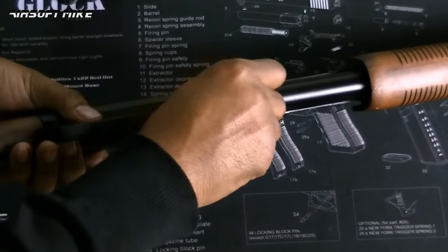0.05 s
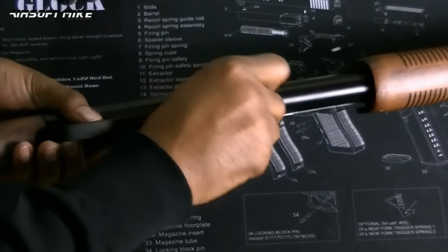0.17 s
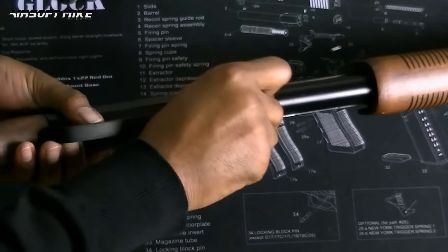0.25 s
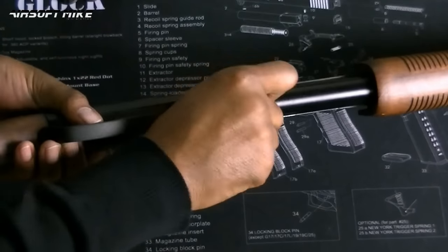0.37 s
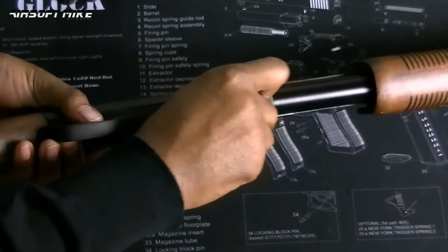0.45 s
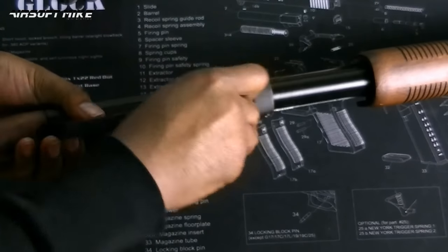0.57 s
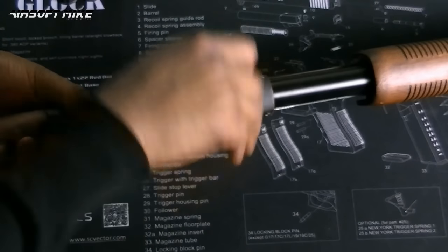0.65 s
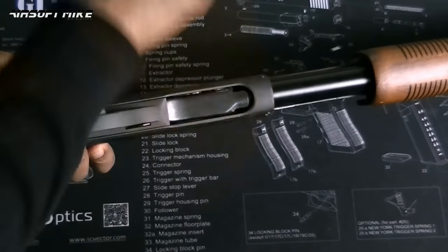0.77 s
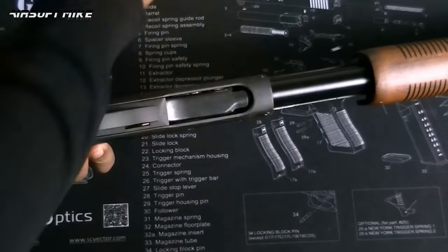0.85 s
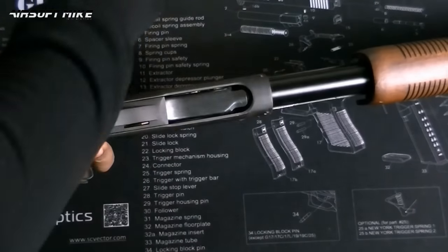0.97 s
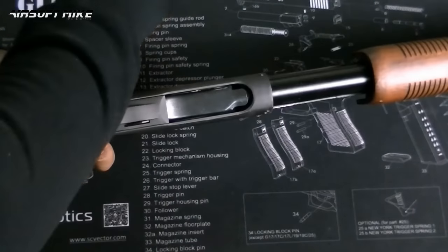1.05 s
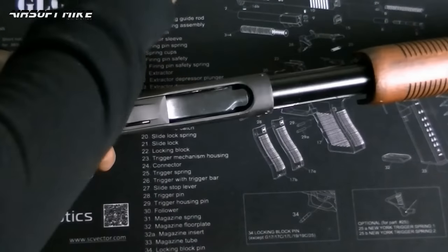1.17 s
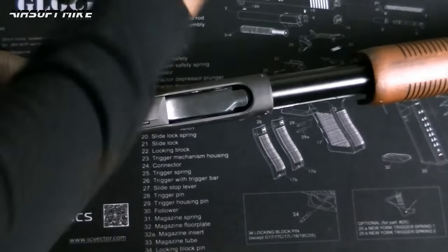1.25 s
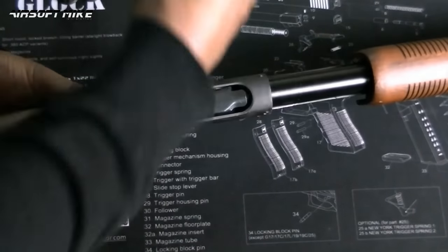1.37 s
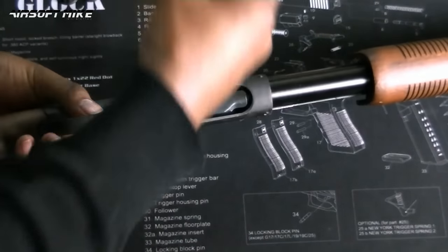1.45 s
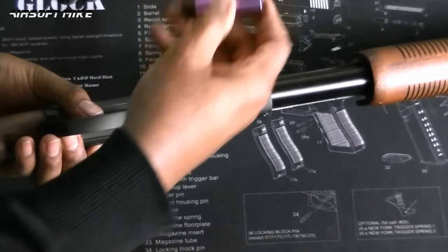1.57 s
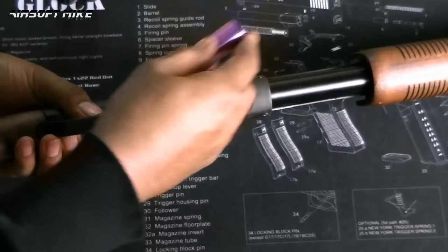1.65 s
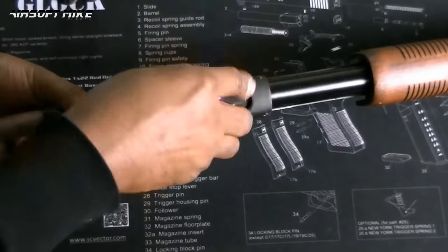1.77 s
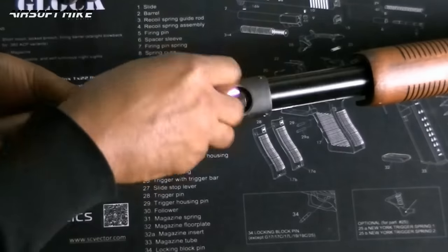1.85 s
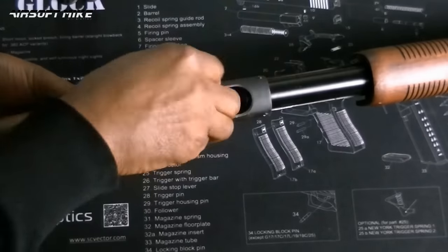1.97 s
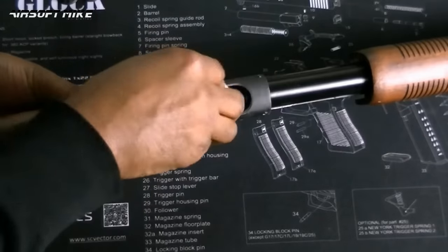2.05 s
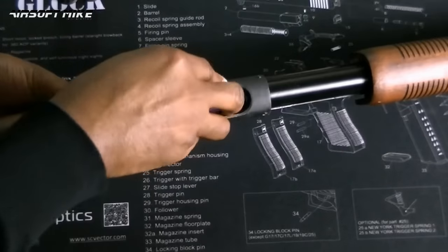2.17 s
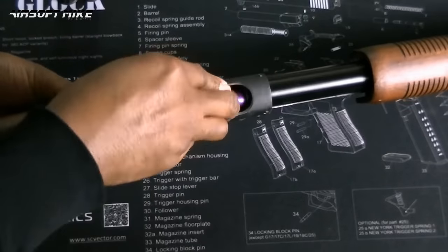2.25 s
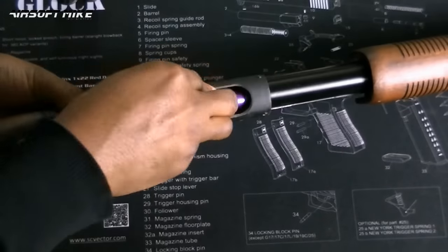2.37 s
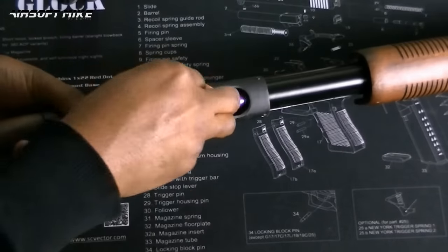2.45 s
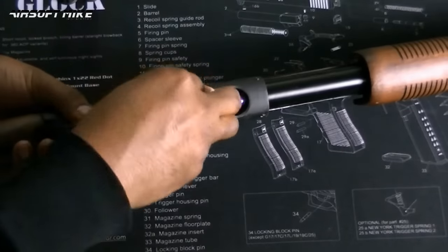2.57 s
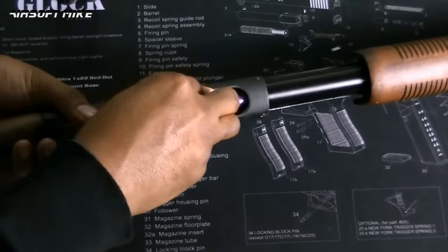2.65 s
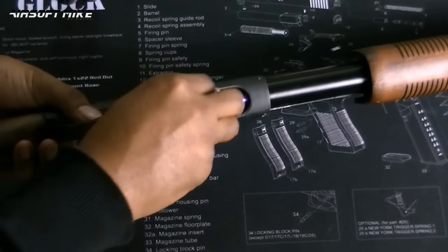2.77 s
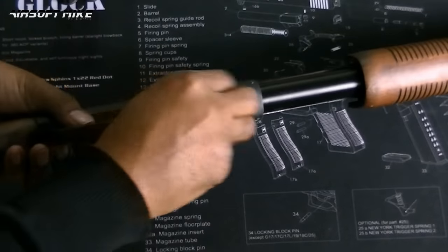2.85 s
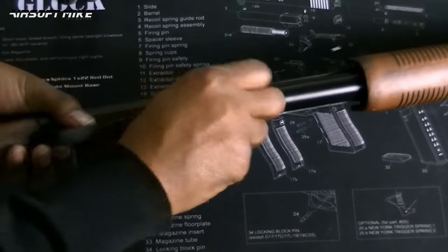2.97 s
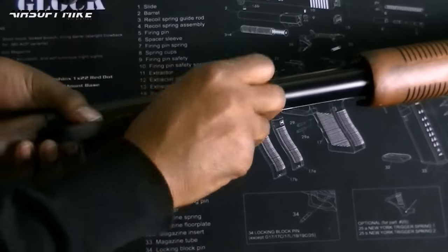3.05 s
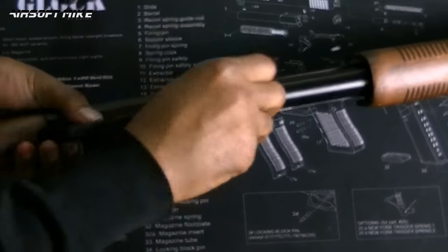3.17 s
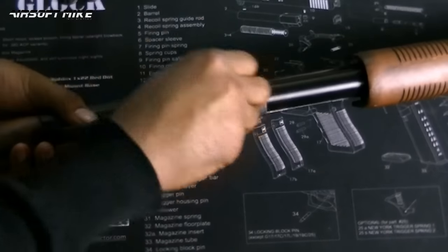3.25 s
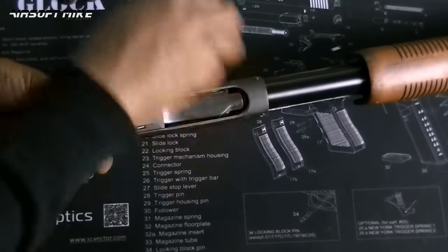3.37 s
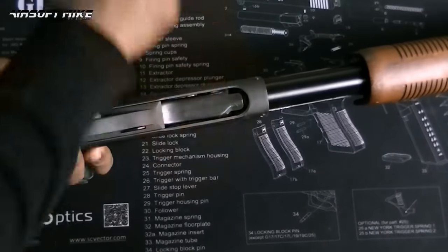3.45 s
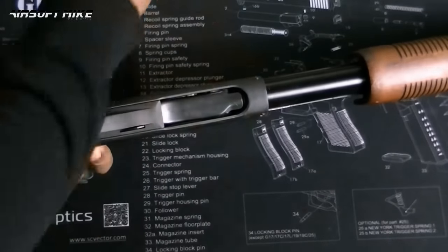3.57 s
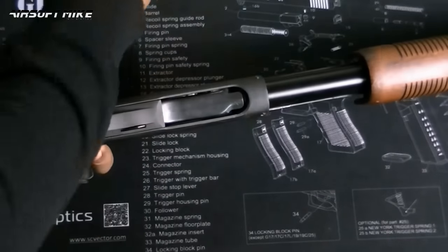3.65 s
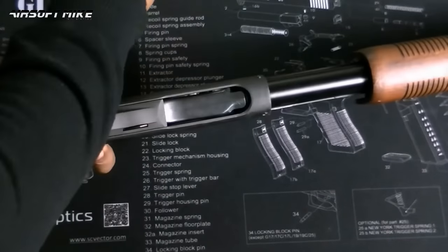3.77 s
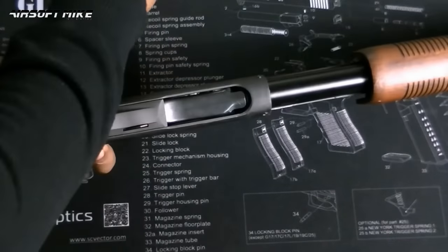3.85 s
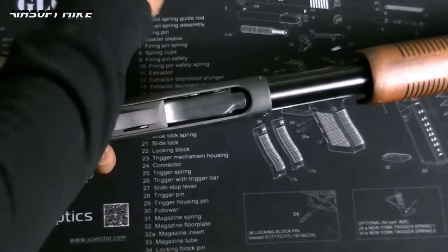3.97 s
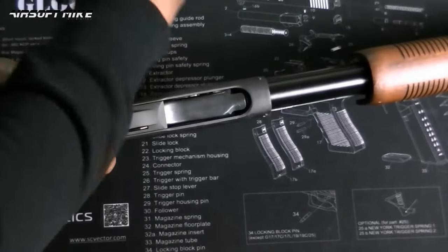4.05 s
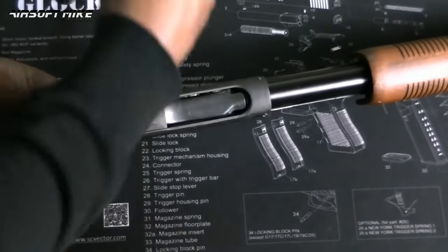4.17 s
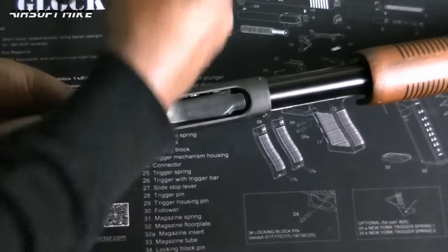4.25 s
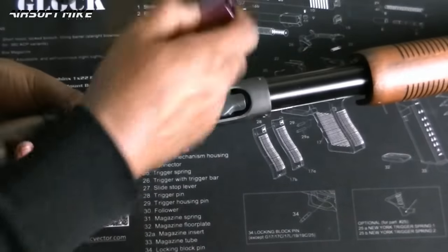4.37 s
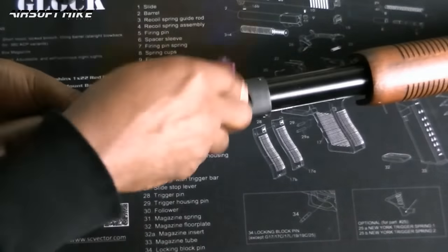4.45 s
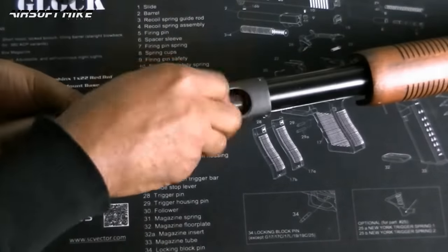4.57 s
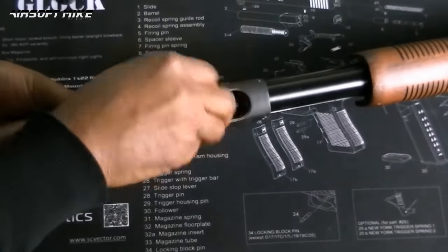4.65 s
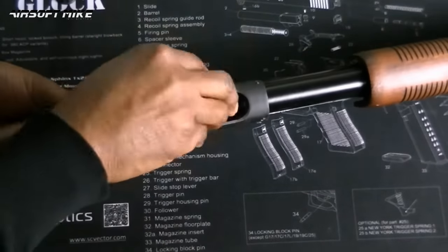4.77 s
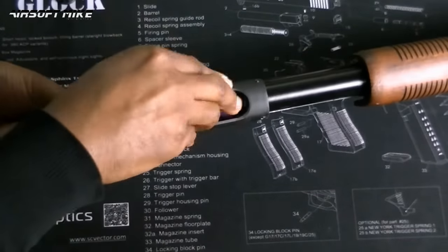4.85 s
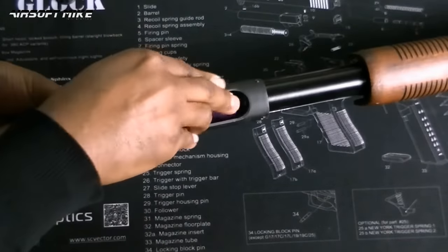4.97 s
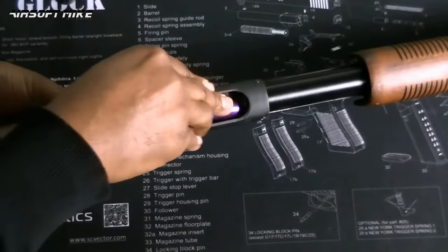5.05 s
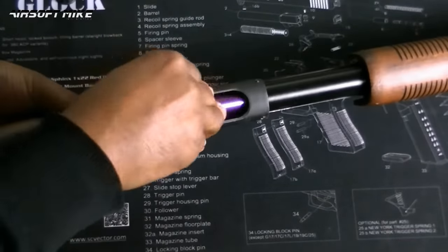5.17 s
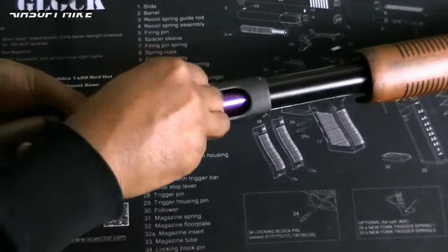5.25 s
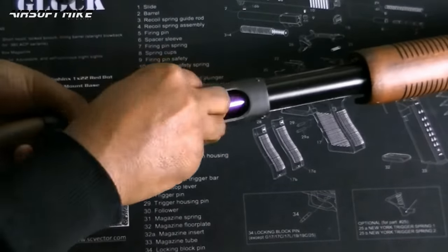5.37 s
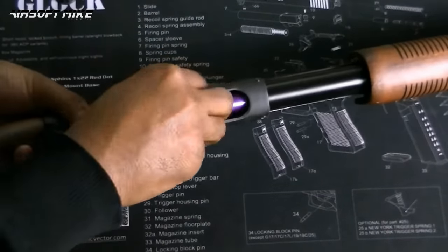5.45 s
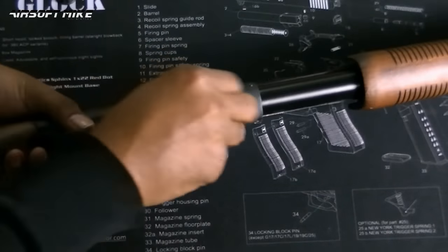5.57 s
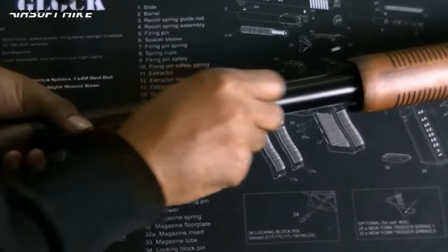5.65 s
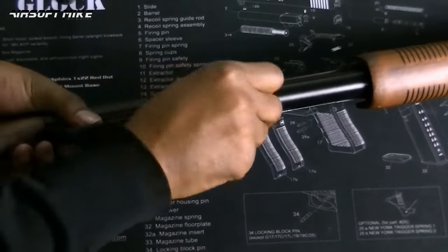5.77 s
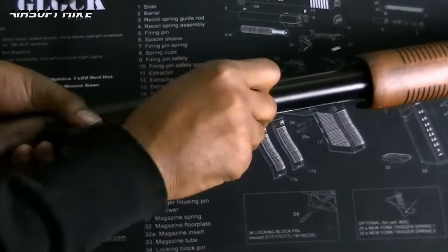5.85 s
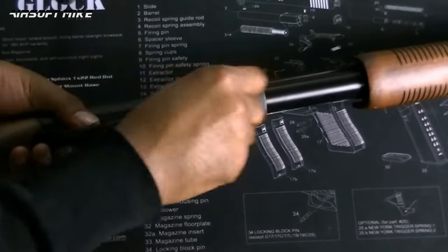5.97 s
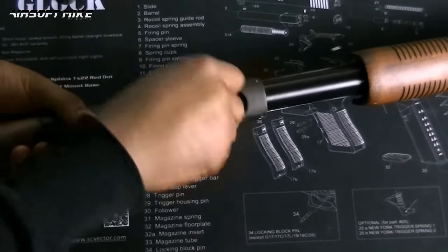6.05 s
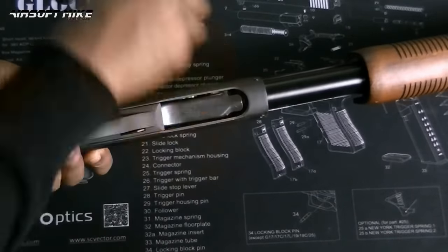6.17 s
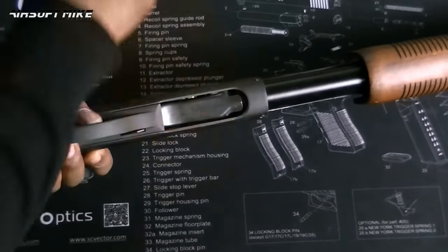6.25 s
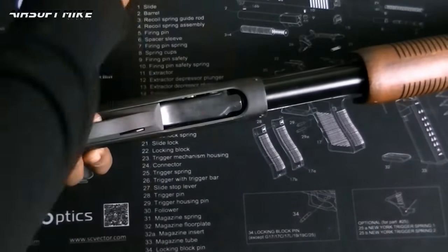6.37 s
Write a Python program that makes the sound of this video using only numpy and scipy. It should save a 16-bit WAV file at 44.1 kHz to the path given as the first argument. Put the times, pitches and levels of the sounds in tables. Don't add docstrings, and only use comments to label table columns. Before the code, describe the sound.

Very close to the microphone, shells are loaded into a toy shotgun. Hard metallic clacks and plastic ticks come in tight bursts, with short gritty scrapes along a hollow tube and a thin spring chirp. A pause with a faint sleeve brush follows, then more clicks, another pause, a few muffled wobbles and a final fast cluster. Dull thuds on the mat lie underneath; a small hard room answers each hit over quiet fan hum.

```python
import sys
import numpy as np
from scipy import signal
from scipy.fft import rfft, irfft, next_fast_len
from scipy.io import wavfile
from scipy.ndimage import uniform_filter1d

SR = 44100
rng = np.random.default_rng(int(sys.argv[2]) if len(sys.argv) > 2 else 0)


def magnitude_from_level(level_db):
    exponent = np.asarray(level_db, float) / 20
    return 10 ** exponent


def int16_out(signal):
    q = np.round(np.clip(np.atleast_2d(signal).T, -1, 1) * 32767)
    wavfile.write(sys.argv[1], SR, q.astype(np.int16))


N = 282681


def evened(x):
    return x / np.sqrt(np.mean(x ** 2) + 1e-20)


def read(points, hz):
    f, value = np.transpose(points)
    return np.interp(np.log(hz + 1), np.log(f + 1), value)


def add(mix, s, sound):
    part = mix[round(s * SR):][:len(sound)]
    part += sound[:len(part)]


def coloured(x, db_at):
    size = next_fast_len(N + 4096)
    gain = magnitude_from_level(db_at(np.fft.rfftfreq(size, 1 / SR)))
    return irfft(rfft(x, size) * gain, size)[..., :N]


def resonate(x, hz, width):
    r = np.exp(-np.pi * width / SR)
    pole = r * np.exp(2j * np.pi * hz / SR)
    return 2 * signal.lfilter([1 - r], [1, -pole], x).real


def body(x, humps):
    return sum((-1) ** k * magnitude_from_level(db) * resonate(x, f, w) for k, (f, w, db) in enumerate(humps))


# [f/Hz, level/dB per Hz]
HUM = [(12, -43), (20, -7), (142, -13), (262, -9.5), (976, -15), (3740, -25), (13900, -42), (16000, -74)]
# [f/Hz, likeness 0..1]
HUM_SAME = [(60, 0.76), (180, 0.47), (550, 0.47), (1650, 0.57), (4970, 0.52), (15000, 1)]
# [f/Hz, width/Hz, level/dB]
FAN = [(149.3, 14, -69), (193.5, 11, -69), (413.6, 13.4, -74), (3200, 31, -75), (4060, 27, -78.5)]


def hum():
    level_db, patch_db = -58.5, 1.0
    frames, hz = N // 256 + 5, np.fft.rfftfreq(1024, 1 / SR)
    a, b, c, d, patches = rng.standard_normal((frames, 513, 5)).T
    patches = evened(uniform_filter1d(uniform_filter1d(patches, 8, 0), 20, 1))
    same = np.clip(read(HUM_SAME, hz), -1, 1)[:, None]
    left = a + 1j * b
    right = same * left + np.sqrt(1 - same ** 2) * (c + 1j * d)
    z = np.array([left, right]) * magnitude_from_level(read(HUM, hz)[:, None] + patch_db * patches)
    air = magnitude_from_level(level_db) * evened(signal.istft(z, nperseg=1024, noverlap=768)[1][:, :N])
    noise = rng.standard_normal(N)
    return air + sum(magnitude_from_level(db) * evened(resonate(noise, f, w)) for f, w, db in FAN)


# [t/s, length/s, scrape level/dB at the start, growth/dB to the end]
SLIDES = [
    (0.0, 0.026, -22.5, -21),
    (0.017, 0.11, -37, 12.5),
    (0.406, 0.039, -30.5, -10.5),
    (0.553, 0.05, -33, 11.5),
    (2.842, .155, -28, 3.5),
    (5.614, .113, -24, -6),
]
# [t/s, length/s, scrape level/dB at the start, growth/dB to the end]
NUDGES = [
    (5.13, 0.023, -64, 31),
    (6.0, .02, -48, 9.9),
    (.538, .012, -47, 17),
    (5.536, .01, -48, 16),
]
NUDGE_SPEED = 0.15
# [f/Hz, width/Hz, level/dB]
SCRAPE = [(1770, 1370, 2), (2400, 1000, -6.5), (3200, 590, -5), (4500, 1800, 7), (5630, 810, 11),
          (6300, 860, 6)]
# [f/Hz, width/Hz, level/dB]
TUBE = [(604, 54, -13), (772, 109, -10.5), (881, 30.3, 2.5), (958.6, 47, 2), (1070, 154, -4.5)]
# [f/Hz, width/Hz, level/dB]
HISS = [(8300, 530, -3.5), (10400, 1470, 0.5), (13800, 5500, -5.5)]


def slide(start, length, db, growth_db, top_speed=1):
    drone_ends_db, drone_fast_db = -5, -33.5
    hiss_ends_db, hiss_fast_db = -6.5, -1.5
    slips_per_s = 14000
    t = np.arange(0, length, 1 / SR)
    speed = top_speed * np.sin(np.pi * t / length)
    drone_db = drone_ends_db + (drone_fast_db - drone_ends_db) * speed
    hiss_db = hiss_ends_db + (hiss_fast_db - hiss_ends_db) * speed
    sign, grip = rng.standard_normal((2, SR // 4))[:, :len(t)]
    size, draw = rng.random((2, SR // 4))[:, :len(t)]
    slips = sign * magnitude_from_level(2.7 * np.minimum(-np.log(size), 3)) * (draw < slips_per_s / SR)
    slips *= magnitude_from_level(0.91 * evened(uniform_filter1d(grip, 150)))
    scrape, drone, hiss = (body(slips, humps) for humps in (SCRAPE, TUBE, HISS))
    sound = evened(scrape) + magnitude_from_level(drone_db) * evened(drone) + magnitude_from_level(hiss_db) * evened(hiss)
    edges = np.clip(np.minimum(t + (start == 0), length - t) / 0.002, 0, 1)
    return start, magnitude_from_level(db + growth_db * t / length - 2.0) * sound * edges


# [t/s, peak level/dB, contact f/Hz, gun shake/dB re peak, treble crack/dB re peak]
SNAPS = [(0.0149, -14.5, 5270, -4.5, -16), (0.4124, -28, 3200, 5, -3), (1.9663, -11, 4610, -7, -11),
         (2.6493, -21.5, 4490, -11, -8.5), (2.9091, -15.5, 4690, -10, -18), (2.9413, -28, 3180, 6, 5.5),
         (3.0183, -2, 4500, -6.5, -16), (3.394, -12.5, 2246, -9.5, -14.5), (4.6297, -7, 4540, -11, -15),
         (5.1905, -5, 4530, -6.5, -7), (5.5665, -14, 5780, -7.5, -8), (5.7276, -13.5, 2960, 1, -14),
         (6.1559, -9.5, 2720, -13.5, -14)]
# [t/s, peak level/dB, contact f/Hz, shake/dB re peak]
TICKS = [(0.1033, -6.5, 1650, -7), (0.1143, -9.5, 3440, -11), (0.4209, -33, 3220, -10),
         (0.6211, -6.5, 3110, -7.5), (0.6398, -12.5, 1600, -9.5), (0.7146, -9.5, 2080, -13),
         (1.1162, -28.5, 5100, -5.5), (1.9787, -15, 5000, -11), (2.0685, -15, 1770, -11),
         (2.2601, -13.5, 3200, -11), (2.3225, -27.5, 4200, -14.5), (2.7726, -33.5, 3100, -13),
         (2.8395, -7, 2890, -3.5), (3.8691, -27.5, 4920, -6), (3.9758, -28.5, 4920, -6.5),
         (5.0854, -26, 1780, -7), (5.2554, -7.5, 4740, -9.5), (5.5442, -12, 1980, -6),
         (5.5512, -16.5, 2000, -4.5), (5.7364, -7, 2900, 3), (6.0215, -13, 1970, 4.5),
         (6.0471, -2, 3150, -7.5)]
# [t/s, peak level/dB, contact f/Hz, shake/dB re peak, tube ring/dB re peak]
CLACKS = [(0.1946, -12.5, 4160, -6, -5), (0.2055, -2.5, 3130, -2, -8), (0.5966, -7, 2015, -4, -7),
          (0.6105, -12, 1600, -20, -9), (2.4019, -1, 4420, -6.5, -11.5), (2.7582, -32, 2940, -7.5, -7),
          (3.046, -5.5, 3144, -1, -6), (5.249, -6.5, 3070, -5, -19.5), (5.4114, -11.5, 4700, -6, -15.5),
          (5.7410, -3.5, 4060, -5, -17), (5.7514, -5, 2480, -2, -5), (6.0329, -6, 4500, -5.5, -10.5)]
# [t/s, peak level/dB, contact f/Hz, shake/dB re peak, tube ring/dB re peak]
KNOCKS = [(0.2796, -16, 1237, 1.5, -5), (0.5492, -14, 3230, 1.5, -13), (2.0345, -7.5, 4430, -11.5, -17),
          (2.2263, -18.5, 3100, -2.5, -6), (2.3454, -16, 3330, -9, -15.5), (2.3828, -9.5, 1420, -23, -6),
          (2.4851, -12.5, 2980, -5.5, -14.5), (2.8264, -27, 3120, 2, -7), (2.8888, -11.5, 4800, -8, -11),
          (3.0038, -6.5, 4370, 1, -11.5), (3.271, -16.5, 3350, -6.5, -7.5), (5.0765, -21, 1650, -4, -7.5),
          (5.1511, -11.5, 2540, -6, -6), (5.6120, -16, 3020, -0.5, -1)]
# [t/s, peak level/dB, contact f/Hz, shake/dB re peak, tube ring/dB re peak]
WOBBLES = [
    (4.7132, -8, 3560, -3, -14.5),
    (4.776, -14, 4620, -6, -15),
    (4.8534, -35, 4300, -22, -5),
    (4.8778, -21, 1530, -12, -10.5),
    (4.8983, -24, 1650, -8, -9.5),
    (4.9472, -32, 1770, -19, -21),
]


def contacts():
    snap_tube_db, tick_tube_db, tick_bright_db = -21, -24, -19.5
    rows = [(*row[:-1], snap_tube_db, row[-1]) for row in SNAPS]
    rows += [(*row, tick_tube_db, tick_bright_db) for row in TICKS]
    for kind, bright_db in ((CLACKS, -11.5), (KNOCKS, -22), (WOBBLES, -29)):
        rows += [(*row, bright_db) for row in kind]
    return sorted(rows)


def rung(modes, t, luck, spread_db):
    hz, db, t60 = np.transpose(modes)[:, :, None]
    size, tune = luck[:2 * len(modes)].reshape(2, -1, 1)
    level = np.sign(tune) * magnitude_from_level(db + spread_db * size - 60 * t / t60)
    return (level * np.sin(2 * np.pi * hz * (1 + 0.02 * tune) * t)).sum(0)


# [f/Hz, level/dB, t60/s]
PARTS = [(1462, -2.5, 0.02), (1770, -9.5, 0.041), (2087, -1, 0.011), (2616, 1.5, 0.0073),
         (3365, -2.5, 0.0079), (3365, -7.5, 0.0033), (4500, 0.5, 0.018), (4817, -9.5, 0.033),
         (5784, -8, 0.016), (6840, -6, 0.014)]
# [f/Hz, level/dB, t60/s]
PING = [(9250, -65.5, 0.12), (9680, -44, 0.12)]
# [f/Hz, width/Hz, level/dB]
GUN = [(1330, 180, 0.5), (1770, 250, 6), (2450, 2250, -1.5), (3210, 800, 6.5), (4390, 1470, 0),
       (6220, 3600, 0)]


def click(row, luck):
    s, peak_db, hz, shake_db, tube_db, bright_db = row
    t = np.arange(len(luck)) / SR
    touch = magnitude_from_level(-60 * t / 0.035) * (1 - np.exp(-t / 0.0002)) / (1 + (t / 0.006) ** 6)
    tone = 0.91 * np.sin(2 * np.pi * hz * t)
    tone += 2.4 * resonate(luck[::-1], hz, 600)
    tone += 1.33 * resonate(resonate(luck, hz, 3500), hz, 6600)
    nearby = [(f, db - 3 * abs(np.log2(f / hz)), t60) for f, db, t60 in PARTS]
    metal = touch * tone + rung(nearby, t, luck, spread_db=3)
    treble = signal.butter(3, 6800, "high", fs=SR)
    swell = (1 - np.exp(-t / 0.0053)) * magnitude_from_level(-60 * t / 0.23)
    tube = magnitude_from_level(tube_db - 6.0) * swell * evened(resonate(body(luck[::-1], TUBE), 900, 450.3))
    crack = magnitude_from_level(bright_db + 8.5) * touch ** 2 * signal.lfilter(*treble, luck)
    near = metal / abs(metal).max() + crack + tube + rung(PING, t, luck[50:], spread_db=5.06)
    jolt = (t[:600] == 0) * 1.
    gun = GUN + [(hz, 1300, -2)]
    humps = [(f, w, db + 2.7 * chance) for (f, w, db), chance in zip(gun, luck[80:])]
    damped = signal.butter(2, 7000, fs=SR)
    shake = evened(signal.lfilter(*damped, body(jolt, humps)))
    shake += magnitude_from_level(bright_db + 9.0) * evened(signal.lfilter(*treble, jolt))
    return magnitude_from_level(peak_db) * near, magnitude_from_level(peak_db + shake_db - 12.5) * shake


# [t/s, peak level/dB, f/Hz]
THUDS = [(0.114, -59, 417), (0.204, -34, 452), (0.608, -29, 410), (2.838, -29.5, 242), (3.004, -29, 411),
         (3.27, -30, 416), (3.393, -36, 433), (5.249, -27.5, 428), (5.41, -26, 424), (5.742, -29.5, 387),
         (6.032, -21.5, 430)]


def thud(hz, luck):
    t = np.arange(len(luck)) / SR
    return (1 - np.exp(-t / 0.0047)) * magnitude_from_level(-60 * t / 0.079) * evened(resonate(luck, hz, 130))


# [t/s, level/dB]
LATCH_RINGS = [
    (.206, -35),
    (2.403, -32),
    (5.752, -35.5),
]


def latch(s, db):
    hz, width_hz, t60_s = 9470, 210, 0.37
    t = np.arange(SR // 2) / SR
    ring = evened(resonate(rng.standard_normal(len(t)), hz, width_hz))
    return s, magnitude_from_level(db - 60 * t / t60_s) * ring


# [t/s, length/s, top level/dB, f/Hz, share of the length spent rising]
SQUEAKS = [
    (0.401, 0.038, -33.5, 3200, .6),
    (0.554, 0.052, -23.5, 3273, .38),
    (2.937, .06, -30.5, 3230, .9),
    (5.608, .118, -24.5, 3230, 0.37),
]


def squeak(start, length, top_db, hz, rising):
    rise_db, fall_db, climb_per_s = -7.5, -7.5, 0.45
    t = np.arange(0, length, 1 / SR)
    wander = rng.standard_normal((2, SR // 4))[:, :len(t)]
    waver, flutter = (evened(uniform_filter1d(v, 130)) for v in wander)
    pitch = hz * (1 + climb_per_s * (t - length / 2)) * (1 + 0.011 * waver)
    turns = np.cumsum(pitch) / SR
    db = top_db + np.interp(t / length, [0, np.clip(rising, 0, 1), 1], [rise_db, 0, fall_db])
    tone = np.sin(2 * np.pi * turns) + 0.17 * np.sin(2 * np.pi * 1.76 * turns)
    return start, magnitude_from_level(db + 2.7 * flutter) * tone * signal.windows.tukey(len(t), 0.2)


# [t/s, length/s, level/dB]
SLEEVE = [
    (1.372, 0.2, -76),
    (4.078, .2, -72.5),
    (4.379, .17, -76.5),
]


def sleeve(start, length, db):
    fibres = rng.standard_normal(SR // 4)[:round(length * SR)]
    brush = resonate(fibres, 5200, 1520) + 0.56 * resonate(fibres, 11300, 3000)
    return start, magnitude_from_level(db + 7.5) * evened(brush) * signal.windows.tukey(len(fibres), 0.6)


# [f/Hz, t60/s]
WALLS = [(250, 0.5), (660, 0.47), (1740, 0.47), (4590, 0.48), (12100, 0.3)]
# [f/Hz, level/dB]
WALL_COLOUR = [(200, 10.5), (500, 6), (1000, 0.5), (2500, 2), (5000, -1), (9000, -3), (15000, 1)]
# [t/s, level/dB]
ECHOES = [(.0085, -15.5), (.012, -19.5), (.014, -30), (.019, -24), (.021, -33.5), (.025, -35.5)]


def rooms(near, shakes, wet_db, side_db):
    size, feeds = SR // 2, len(shakes)
    taps = np.zeros((2 * feeds, size))
    slots = np.arange(200, size - 12, 12)
    at = slots + rng.integers(0, 12, (2 * feeds, len(slots)))
    np.put_along_axis(taps, at, rng.choice([-1., 1.], at.shape), 1)
    hz, t, z = signal.stft(taps, SR, nperseg=256)
    decay_db = read(WALL_COLOUR, hz)[:, None] - 60 * t / read(WALLS, hz)[:, None]
    z = z * magnitude_from_level(decay_db) * (1 - np.exp(-t / 0.0012))
    tails = signal.istft(z, SR, nperseg=256)[1][:, :size]
    tails = (tails / np.linalg.norm(tails[0])).reshape(2, feeds, size)
    sent = (shakes + magnitude_from_level(wet_db) * near)[None]
    mid, side = signal.fftconvolve(sent, tails[..., :16000], axes=2)[..., :N].sum(1)
    for k, (s, db) in enumerate(ECHOES):
        add(mid, s, (-1) ** k * magnitude_from_level(db) * near)
    side = coloured(side, lambda f: side_db - 12 * np.clip(f / 12000, 0, 2) ** 2)
    return np.array([mid + side, mid - side])


# [f/Hz, level/dB]
MIC = [(20, -54), (150, -19), (300, -15), (700, -3), (5000, -1), (9000, -2.5), (14500, -18.5), (16600, -45)]
# [f/Hz, left minus right level/dB]
LEAN = [(200, -0.5), (800, -1.5), (3000, 0.35), (8000, 1)]


def microphone(heard):
    left, right = (coloured(x, lambda f: read(MIC, f) + lean * read(LEAN, f))
                   for x, lean in zip(heard, (0.5, -0.5)))
    return np.array([left, right])


def scene():
    near, shakes, hits = np.zeros(N), np.zeros((3, N)), contacts()
    for k, (row, luck) in enumerate(zip(hits, rng.standard_normal((len(hits), 8000)))):
        contact, shake = click(row, luck)
        add(near, row[0] + 0.00054, contact)
        add(shakes[k % 3], row[0], shake)
    for (s, db, hz), luck in zip(THUDS, rng.standard_normal((len(THUDS), 5000))):
        add(near, s, magnitude_from_level(db + 2.0) * thud(hz, luck))
    for source, rows in ((slide, SLIDES), (squeak, SQUEAKS), (sleeve, SLEEVE), (latch, LATCH_RINGS)):
        for row in rows:
            add(near, *source(*row))
    for row in NUDGES:
        add(near, *slide(*row, top_speed=NUDGE_SPEED))
    heard = near + rooms(near, shakes, wet_db=-13.5, side_db=-15.5)
    return microphone(heard) + hum()


def top_cut(x):
    return signal.sosfilt(signal.butter(12, 16810, fs=SR, output="sos"), x)


def record(dry):
    cut = signal.lfilter(*signal.butter(2, 34, "high", fs=SR), dry)
    ceiling = 1.2
    return top_cut(ceiling * np.tanh(cut / ceiling))


dry = scene()
out = record(dry)
int16_out(out)
```